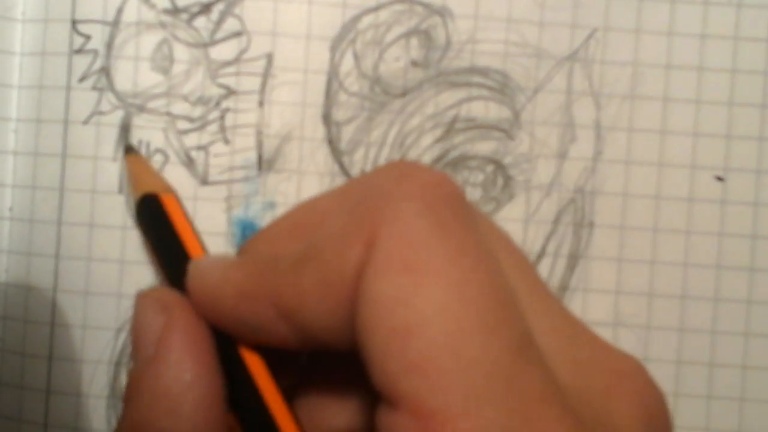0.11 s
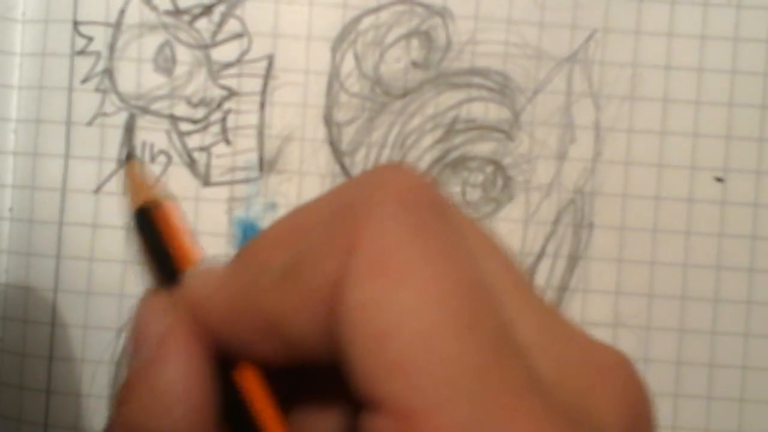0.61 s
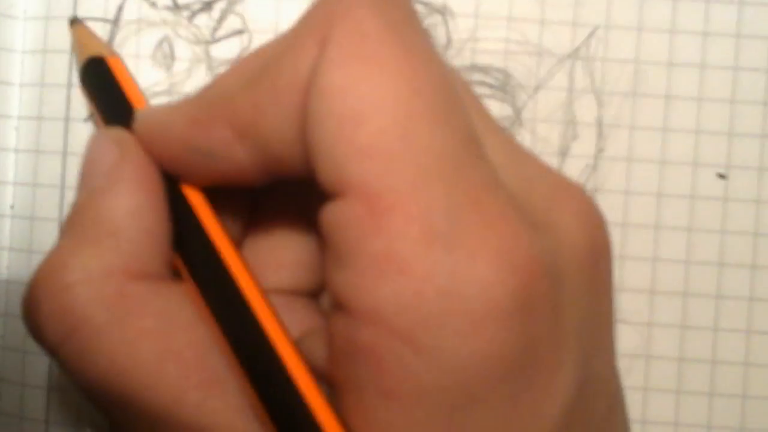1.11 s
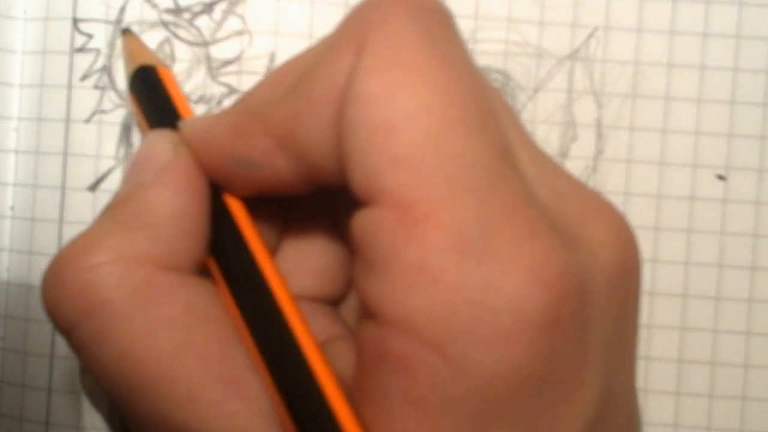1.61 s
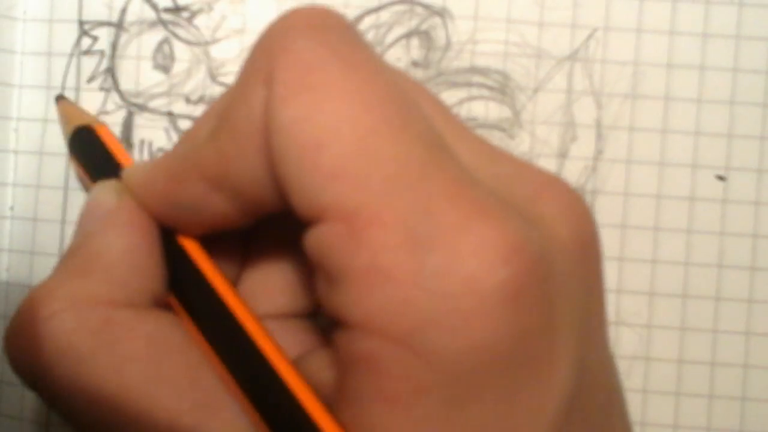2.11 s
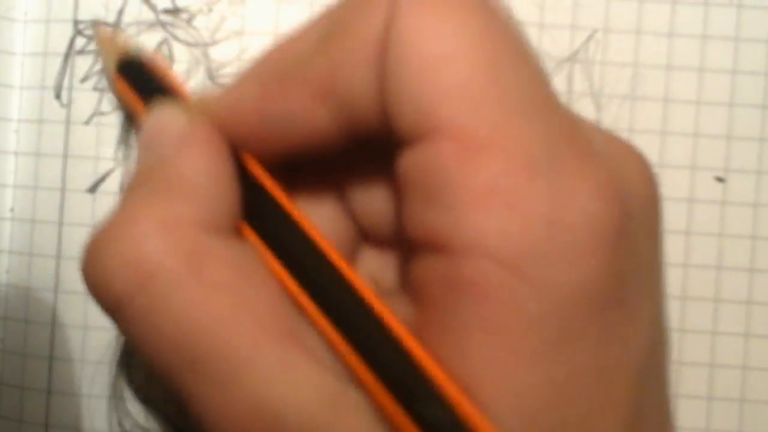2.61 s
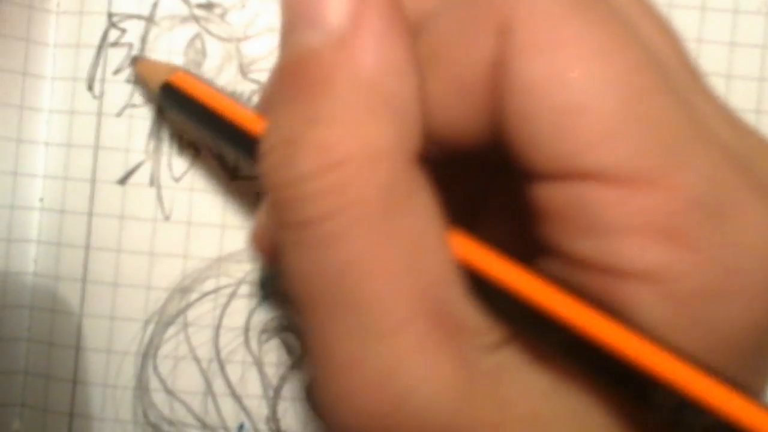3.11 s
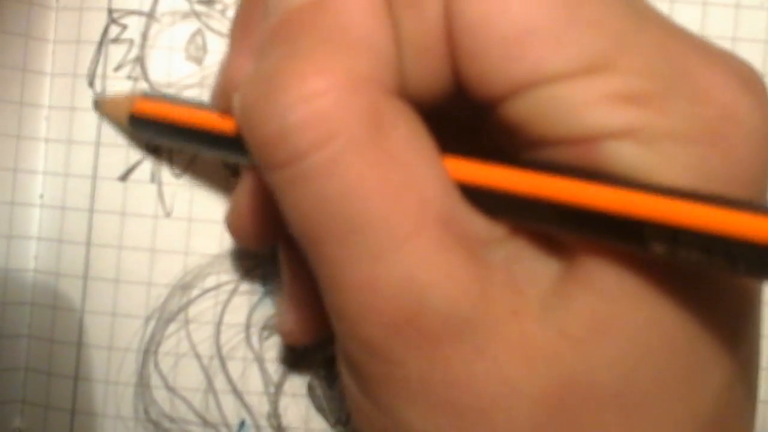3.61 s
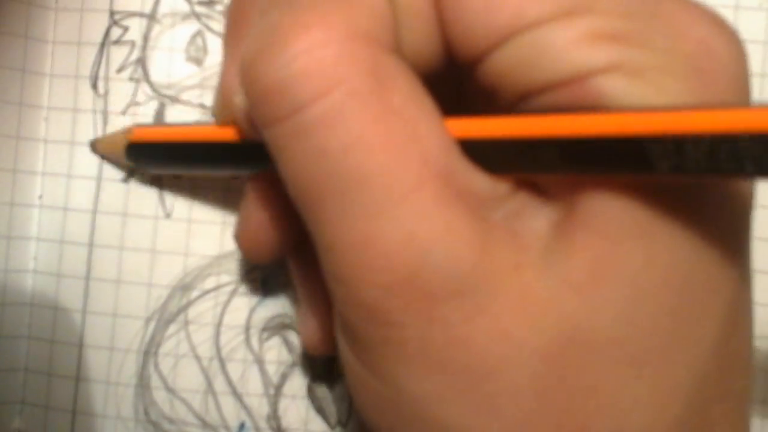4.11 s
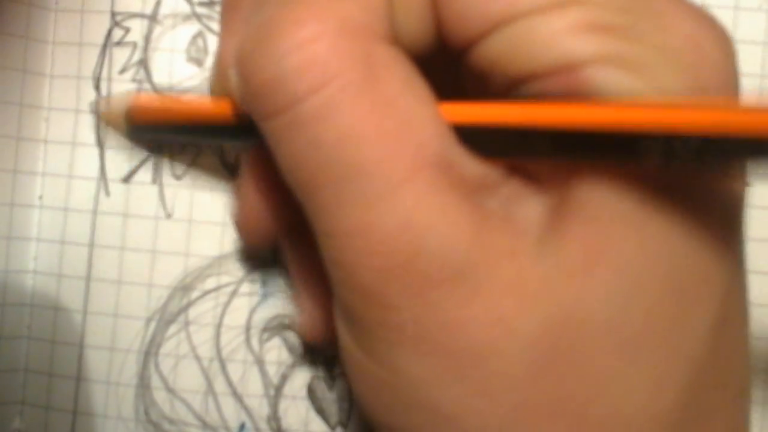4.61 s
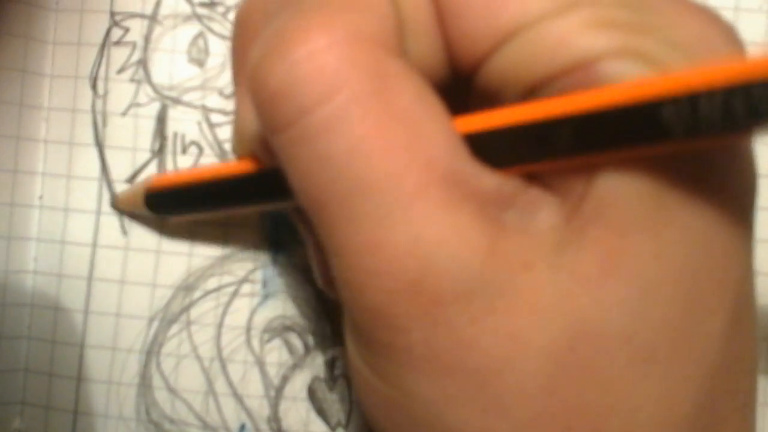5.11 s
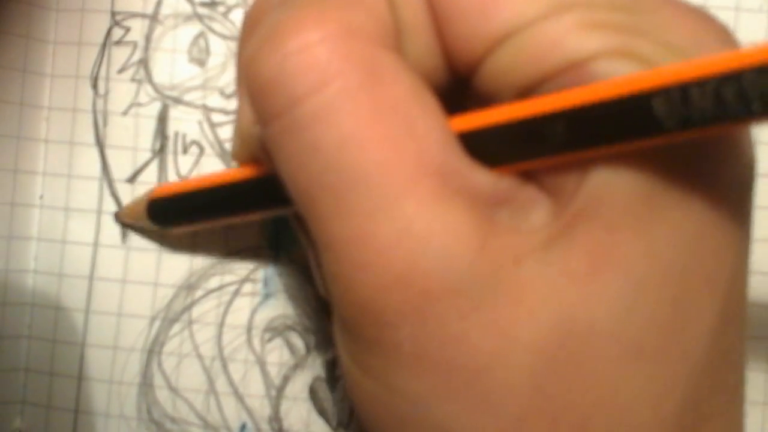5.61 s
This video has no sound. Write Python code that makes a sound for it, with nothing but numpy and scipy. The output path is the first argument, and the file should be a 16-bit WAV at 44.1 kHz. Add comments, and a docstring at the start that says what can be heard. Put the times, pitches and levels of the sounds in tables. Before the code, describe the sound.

A pencil sketches on a paper pad resting on a wooden desk. First come low, muffled hand rubs and thuds with light scratches, then firmer short strokes, a tiny paper rustle and a crisp tip click. After a near-quiet pause, rapid dry scratching builds, dotted with ticks and one sharp tap. Everything is close and dry, over low room hum.

```python
"""First a quiet room hum with a thin electronic whine, and a hand dragging on a wooden desk;
then bumps, pencil strokes on a paper pad, tip ticks and paper rustles, close to a small microphone.
Strokes and drags are random clicks (friction grains) ringing the modes of pencil and desk; bumps and
ticks are noise bursts into modes; rustles are crackle in a rising band; hum and whine are filtered noise."""
import sys
import numpy as np
from scipy import signal
from scipy.io import wavfile
from scipy.ndimage import uniform_filter1d

SR = 44100
rng = np.random.default_rng(int(sys.argv[2]) if len(sys.argv) > 2 else 0)


def voltage_ratio(decibels):
    """Convert decibels (scalar or array-like) to amplitude ratios, 20 dB per decade."""
    exponent = np.asarray(decibels, float) / 20
    return 10 ** exponent


def materialize(psi):
    """Save the field psi as 16-bit PCM at rate SR to the path in sys.argv[1].

    A 1-D psi becomes a single channel; in a 2-D psi each row is a channel.
    """
    bounded = np.clip(np.atleast_2d(psi).T, -1, 1)
    quanta = np.round(bounded * 32767).astype(np.int16)
    wavfile.write(sys.argv[1], SR, quanta)


N = 253575  # length of the scene [samples]
HZ = abs(np.fft.fftfreq(2 ** 15, 1 / SR))  # frequency grid of every filter [Hz]


def evened(x):
    """Normalization: scales a signal to an rms of 1."""
    return x / np.sqrt(np.mean(x ** 2) + 1e-20)


def curves(table):
    """Linear interpolation: reads every column after the time at each sample."""
    s, *columns = np.transpose(table)
    return [np.interp(np.arange(N) / SR, s, column) for column in columns]


def causal(x, gain):
    """Minimum phase: filters with the most prompt causal response that has this gain at HZ."""
    log_spectrum = np.conj(signal.hilbert(np.log(gain + 1e-6)))
    taps = np.fft.ifft(np.exp(log_spectrum)).real
    return signal.oaconvolve(x, taps[:len(taps) // 2])[:len(x)]


def colour(x, points):
    """Spectral shaping: filters by a (frequency [Hz], level [dB]) curve, linear in log frequency."""
    hz, db = np.transpose(points)
    return causal(x, voltage_ratio(np.interp(np.log(HZ + 1), np.log(hz), db)))


def ring(x, modes):
    """Modal superposition: filters by a body whose steep resonances add in power."""
    power = np.zeros(len(HZ))
    for hz, width, db in modes:
        bend = ((HZ - hz) / width * 2) ** 2
        power += voltage_ratio(2 * db) / width / (1 + bend) / (1 + bend / 4)
    return causal(x, np.sqrt(power))


def resonate(x, hz, width):
    """Heterodyne resonance of peak gain 1: shifts hz down to zero, smooths, and shifts back."""
    turn = np.exp(2j * np.pi * np.cumsum(hz * np.ones(len(x))) / SR)
    r = np.exp(-np.pi * abs(width) / SR)
    return 2 * (turn * signal.lfilter([1 - r], [1, -r], x / turn)).real


def grit(per_s, spread_db, lumps_db, lump_s):
    """Stick-slip friction as shot noise: random clicks of uneven size whose strength comes in lumps."""
    size = voltage_ratio(spread_db * np.minimum(rng.exponential(1, N), 3)) * rng.standard_normal(N)
    lumps = evened(uniform_filter1d(rng.standard_normal(N), max(round(lump_s * SR), 1)))
    clicks = rng.random(N) < per_s / SR
    return evened(size * clicks * voltage_ratio(lumps_db * lumps))


def blows(rows, body, chatter_s, after_db, after_s):
    """Impact excitation: a burst of chatter, then a fainter rattle, rings each part of a body."""
    t = np.arange(6000) / SR
    burst = t / chatter_s * np.exp(1 - t / chatter_s)
    shape = burst + voltage_ratio(after_db) * np.exp(-t / after_s)
    out = np.zeros(N + len(t))
    for s, db, *part_db in rows:
        noise = rng.standard_normal(len(t))
        at = round(s * SR)
        for relative_db, modes in zip([0, *part_db], body):
            part = ring(noise * shape, modes)
            out[at:at + len(t)] += voltage_ratio(db + relative_db) * part / abs(part).max()
    return out[:N]


# relative spectrum of the room hum: (frequency [Hz], density [dB per Hz])
ROOM_SPECTRUM = [(20, -9), (35, -18), (60, 1), (110, 4), (400, 0.5), (550, -11), (1000, -13.5),
                 (1550, -13.5), (2900, -19.5), (4700, -25), (6500, -24.5), (9000, -26), (12000, -24),
                 (16000, -24.5)]


def room():
    """Stationary noise: a broadband hum, and an electronic whine as narrowband noise."""
    hum, hiss = rng.standard_normal((2, N))
    whine = ring(hiss, [(10620, 120, 0)])  # centre [Hz], width [Hz], level [dB]
    hum_db, whine_db = -60.5, -75.5  # rms
    return voltage_ratio(hum_db) * evened(colour(hum, ROOM_SPECTRUM)) + voltage_ratio(whine_db) * evened(whine)


# hand resting and dragging on the desk: (time [s], weight [dB], roughness [dB]);
# roughness moves the rub from the slow mode to the upper modes
HAND_DRAG = [(0, -54.5, -3), (.14, -62, -0.5), (.23, -56, 5), (.33, -57.5, -3), (.47, -52.5, 3),
             (.58, -52.5, -3.5), (.7, -58.5, 4.5), (.89, -59.5, -2.5), (1.03, -70.5, 3),
             (1.14, -58.5, -0.5), (1.23, -75.5, 6), (1.33, -52.5, -1.5), (1.56, -57, 2.5), (1.61, -57, -6),
             (1.67, -58.5, -4.5), (1.75, -71.5, 3.5), (1.89, -54.5, 0), (2.02, -63, -6.5),
             (2.21, -55.5, -1), (2.5, -70, 11.5), (2.72, -67, 7.5), (2.97, -70.5, 5.5), (3.06, -60, 1.5),
             (3.3, -68.5, 1), (3.5, -76, 8)]
# shoves of the heel of the hand: (time of peak [s], rise [s], peak in the upper modes [dB],
# second mode against that [dB], slow mode against that [dB])
HEEL_SHOVES = [(0.396, .09, -37, -3.5, -10), (1.46, 0.16, -41.5, -8, -8.5), (2.257, 0.029, -35, -7, -24),
               (2.349, 0.016, -37.5, -12, -26)]


def hand():
    """Sliding friction: power in each group of desk modes, a drag plus shoves that swell and fade."""
    weight_db, rough_db = curves(HAND_DRAG)
    second_mode_db = -0.5
    power = voltage_ratio([weight_db - rough_db, weight_db + second_mode_db, weight_db + rough_db]) ** 2
    rise_db = 28.5  # climbed within the rise time
    fall_db_per_s = np.array([[60], [127], [191]])  # slow, second and upper modes
    for s, rise_s, db, second_db, slow_db in HEEL_SHOVES:
        t = np.arange(N) / SR - s
        peak_db = db + np.array([[slow_db], [second_db], [0]])
        power += voltage_ratio(peak_db - np.maximum(-rise_db * t / rise_s, fall_db_per_s * t)) ** 2
    return power


# desk top, grouped as slow mode, second mode, upper modes: (frequency [Hz], width [Hz], power [dB])
DESK_MODES = [
    [(99.3, 17, -11.5), (135.1, 11.4, -4)],
    [(191.2, 23.3, -4), (207, 34, -14.5)],
    [(265, 40, -4.5), (307, 14, -3), (364, 86, 1), (428.8, 44, -1), (490, 94, -4), (603, 150, -8.5),
     (690, 140, -7.5), (920, 240, -10), (1100, 300, -16.5)],
]
# stroke pressure passed to each of those groups: (level [dB]) per group
STROKE_TO_DESK = [-23, -23, -15.5]
# bumps of the hand: (time [s], slow mode peak [dB], second mode against that [dB],
# upper modes against that [dB])
DESK_BUMPS = [(0.36, -52, -8, 0), (0.394, -44.5, -8, 13), (0.425, -44, 5, 11.5), (1.043, -61, 4, 19.5),
              (1.145, -61, 9, 19.5), (1.417, -42, 6, 8), (1.454, -37, -23, 6), (2.243, -50.5, 8.5, 16),
              (2.259, -55, 9, 5), (2.339, -43.5, 5, 16), (2.377, -44.5, 4, 9.5), (2.998, -60.5, -16, 19)]


def desk(pressure):
    """Forced vibration: dragging, pressing strokes and bumps excite the low modes of the desk top."""
    drag = grit(per_s=2000, spread_db=-0.5, lumps_db=1.0, lump_s=0.013)
    rub = np.zeros(N)
    for hand_power, db, modes in zip(hand(), STROKE_TO_DESK, DESK_MODES):
        gain = np.sqrt(hand_power + (voltage_ratio(db) * pressure) ** 2)
        rub += gain * evened(ring(drag, modes))
    return rub + blows(DESK_BUMPS, DESK_MODES, chatter_s=0.0023, after_db=-19.0, after_s=0.015)


# light glide of tip and hand between strokes: (time [s], pressure [dB], speed [dB])
LIGHT_GLIDE = [(0, -73, -78), (.27, -78, -92), (.46, -57.5, -73), (.66, -68, -66.5), (.98, -68, -68.5),
               (1.38, -69.5, -79.5), (1.54, -63.5, -69.5), (1.9, -69, -88), (2.09, -59, -63),
               (2.26, -55, -65), (2.45, -65, -68), (2.7, -61, -65), (2.98, -67.5, -66.5), (3.28, -68, -72),
               (3.49, -69.5, -100), (3.75, -72, -64.5), (3.99, -60, -70), (4.12, -57, -58),
               (4.24, -60, -65), (4.39, -55.5, -61), (4.57, -58.5, -57), (4.71, -62, -61),
               (4.88, -58.5, -55.5), (5.02, -61, -58), (5.19, -61, -64.5), (5.44, -66, -69.5),
               (5.75, -65.5, -74)]
# strokes: (start [s], length [s], pressure [dB], top speed [dB],
# share of the stroke where it is fastest [0-1])
PENCIL_STROKES = [(0.435, 0.12, -54.5, -57.5, 0.65), (0.618, 0.076, -52, -56.5, 0.6),
                  (0.739, 0.096, -54, -56, 0.47), (.868, 0.046, -58.5, -61.5, 0.23),
                  (0.963, 0.2, -69, -62.5, 0.52), (1.892, 0.17, -57, -68, 0.75),
                  (2.013, 0.071, -57, -60.5, 0.44), (2.096, 0.12, -50, -55.5, 0.63),
                  (2.279, 0.13, -46.5, -53.5, 0.44), (2.48, 0.18, -47, -54.5, 0.44),
                  (2.77, 0.15, -65, -69, .4), (3.005, .128, -57.5, -46, 0.55),
                  (3.73, 0.17, -59.5, -63, 0.95), (3.946, 0.14, -55.5, -56.5, 0.5),
                  (4.131, 0.11, -49.5, -52.5, 0.44), (4.281, 0.077, -45, -50, 0.52),
                  (4.412, .130, -44.5, -47.5, 0.53), (4.557, 0.025, -51.5, -52, 0.2),
                  (4.593, 0.096, -40.5, -45.5, 0.48), (4.727, 0.15, -45.5, -49.5, 0.51),
                  (4.91, 0.083, -44.5, -49.5, 0.55), (5.038, 0.13, -45.5, -50, 0.47),
                  (5.216, 0.061, -45, -50, 0.45), (5.335, 0.067, -48.5, -55.5, 0.45),
                  (5.461, 0.043, -47, -52, 0.48), (5.549, .079, -53.5, -60, 0.57),
                  (5.681, 0.081, -50.5, -54, 0.09)]


def motion():
    """Stroke kinematics: gains of shaft, tip and sheen; a stroke bites, speeds up, slows and lets go."""
    rise_s, release_s = 0.0045, 0.00405  # linear rise, time constant of the release
    arch_db, sheen_arch_db = 6, 14  # drop half a stroke away from the fastest point
    lean = 0.48  # share of the speed drop that pressure follows
    ease_db = -1.5  # change of pressure from bite to end
    pressure, speed = (voltage_ratio(c) ** 2 for c in curves(LIGHT_GLIDE))  # all three add as powers
    peak = speed.copy()
    for start, length, press_db, top_db, fastest in PENCIL_STROKES:
        end = min(round((start + length + 8 * release_s) * SR), N)
        t = np.arange(round(start * SR), end)
        since = np.maximum(t / SR - start, 0)
        u = np.minimum(since / length, 1)
        edge = np.minimum(since / rise_s, 1) * np.exp(-np.maximum(since - length, 0) / release_s)
        off = (u - fastest) ** 2 * 4
        slow_db = -arch_db * off
        pressure[t] += (edge * voltage_ratio(press_db + ease_db * (u - 0.5) + lean * slow_db)) ** 2
        speed[t] += (edge * voltage_ratio(top_db + slow_db)) ** 2
        peak[t] += (edge * voltage_ratio(top_db - sheen_arch_db * off)) ** 2  # sheen needs the fast middle
    return np.sqrt([pressure, speed, peak])


# how the pencil is held: (from time [s], grip column [index])
GRIP_CHANGES = [(0, 1), (.428, 0), (.855, 1), (3.0, 2), (3.17, 1), (3.5, 3), (5.02, 4)]
# pencil on pad, 5 shaft modes, 5 tip modes, then sheen: (frequency [Hz], width [Hz], then relative
# power [dB] in each grip: upright, leaning, lifted while the hand slides, flat, flat and light)
PENCIL_MODES = [(692, 386, 0, 5.5, 7, 0.5, -4.5), (933, 135, 3, 4, -2, -0.5, 2),
                (1072, 156, 6, 8, 11, 2, -5.5), (1239, 72, -1, 0.5, -11, -6.5, -7),
                (2070, 134, 6.5, -30, -25, -19, -28), (2058, 590, 5, 0, -7.5, 3, 2.5),
                (3265, 840, -0.5, 4.5, -4, 3.5, -3.5), (3950, 300, -8, 0, -2, 1.5, -3.5),
                (4515, 420, -3, -2, 2.5, 3.5, 4), (5050, 640, -20, -17, 6, -17, -12),
                (6570, 1400, 2.5, -4.5, 4.5, -11.5, -24), (7400, 1400, -17, -6.5, 0, -8.5, -9),
                (9350, 1300, -8, -27, -1, -15, -12), (10790, 480, -22, -12, 0, -1.5, -5.5),
                (11200, 680, -26, -16, -11, -17, -20), (13100, 1200, -13, -24, -2, -27, -24),
                (14500, 1000, 0, -27, -9, -14, -9)]


def strokes(pressure, speed, peak):
    """Friction-driven resonance: paper grain shakes the pencil, whose modes each grip damps differently."""
    grain = grit(per_s=9000, spread_db=1.0, lumps_db=1.0, lump_s=0.007)
    since, column = np.transpose(GRIP_CHANGES)
    grip = column[np.searchsorted(since, np.arange(N) / SR, "right") - 1]
    sheen = peak * (peak / voltage_ratio(-39)) ** 0.04  # grows faster than speed, pivoting at -39 dB
    out = np.zeros(N)
    for k in range(len(PENCIL_MODES[0]) - 2):
        modes = [(hz, width, db[k]) for hz, width, *db in PENCIL_MODES]
        held = uniform_filter1d(1.0 * (grip == k), 800)  # crossfade of 800 samples
        shaft, tip, gloss = ring(grain, modes[:5]), ring(grain, modes[5:10]), ring(grain, modes[10:])
        out += held * pressure * evened(shaft)
        out += held * (speed * tip + sheen * gloss) / tip.std()
    return out


# tip ticks: (time [s], tip peak [dB], then against the tip: shaft ring [dB], snap of the lead [dB],
# knock of the wood [dB])
TIP_TICKS = [(0.844, -48.5, 13.5, -3, 4), (1.179, -64, 12, -7, -5), (1.4567, -33.5, -15, -0.5, -12.5),
             (1.548, -64, 16, -7, -1), (2.1979, -49.5, 14.5, -11, -3), (2.4776, -52, 12, -7, -18),
             (3.0018, -27, -12, 7.5, -11), (3.029, -44, -25, -7, -24), (3.044, -41, -28, -3, -11),
             (4.048, -48, 2, -16, -14), (4.4821, -36, 2, -9, -8), (4.6023, -45, 11.5, 3, -18),
             (4.6614, -43.5, 16, -3, 6.5), (4.7729, -13.5, -10.5, -6, -11), (5.0148, -55, 16, -7, -6),
             (5.1514, -45, 13, -7, -16), (5.2264, -45, 5, -9, -3), (5.4635, -49, 10.5, -11, -3),
             (5.6885, -32, -5.5, -8, -7.5)]
# what a tick rings, grouped as tip, shaft, lead, wood: (frequency [Hz], width [Hz], power [dB])
TICK_MODES = [
    [(3450, 620, -10), (3910, 290, 3), (4430, 510, 2)],
    [(1064, 154, -5), (620, 580, -15.5)],
    [(5740, 1260, -0.5), (7670, 1100, -3.5), (10500, 890, -9), (13800, 5400, -8)],
    [(2190, 247, 18), (1730, 1100, -22)],
]


def ticks():
    """Impulsive contact: very short blows ring tip, shaft, lead and wood."""
    return blows(TIP_TICKS, TICK_MODES, chatter_s=0.00025, after_db=-14.0, after_s=0.0037)


# paper rustles: (start [s], length [s], level [dB], from frequency [Hz], to frequency [Hz])
PAPER_RUSTLES = [(2.663, 0.077, -54, 1170, 1700), (3.35, 0.053, -56, 980, 1760)]


def rustles():
    """Swept resonance: a fold of paper slips, giving crackly noise in a rising band."""
    crackle = grit(per_s=5000, spread_db=2, lumps_db=1.5, lump_s=0.003)
    out = np.zeros(N)
    for s, length, db, from_hz, to_hz in PAPER_RUSTLES:
        at, n = round(s * SR), round(length * SR)
        hz = np.linspace(from_hz, to_hz, n)
        band = resonate(resonate(crackle[at:at + n], hz, width=700), hz, width=1200)
        out[at:at + n] += voltage_ratio(db) * evened(band) * np.hanning(n) ** 0.5
    return out


def scene():
    """Linear superposition: all sources add at the microphone."""
    pressure, speed, peak = motion()
    mix = room() + desk(pressure) + strokes(pressure, speed, peak) + ticks() + rustles()
    return mix[None]


# response of the small microphone: (frequency [Hz], level [dB])
MIC_RESPONSE = [(25, -18), (45, -1), (80, 0.5), (4800, -2), (5600, -7), (6400, -14), (16000, -20)]


def microphone(dry):
    """Transducer response: a small microphone with little treble and little deep bass."""
    return colour(dry[0], MIC_RESPONSE)[None]


def roll_off(x):
    """The treble ends steeply here."""
    return signal.sosfilt(signal.butter(12, 15720, fs=SR, output="sos"), x)


def record(dry):
    """Signal chain: the scene as the microphone passes it on."""
    mix = microphone(dry)
    return roll_off(mix)


dry = scene()
out = record(dry)
materialize(out)
```